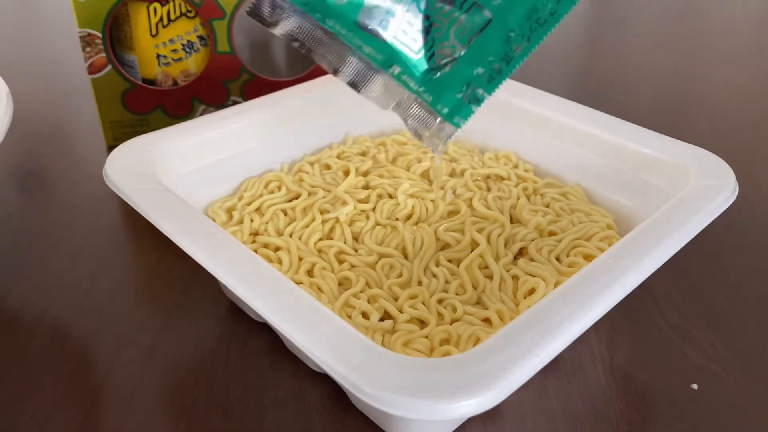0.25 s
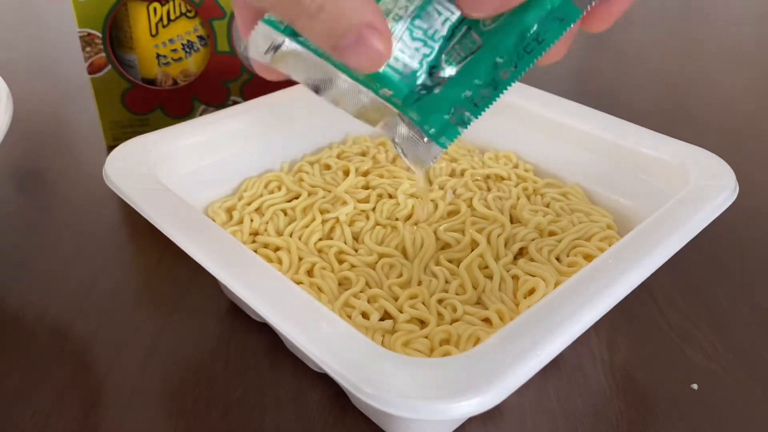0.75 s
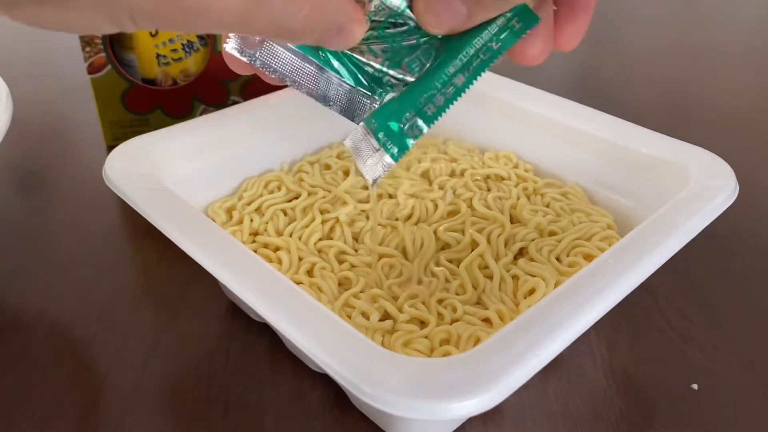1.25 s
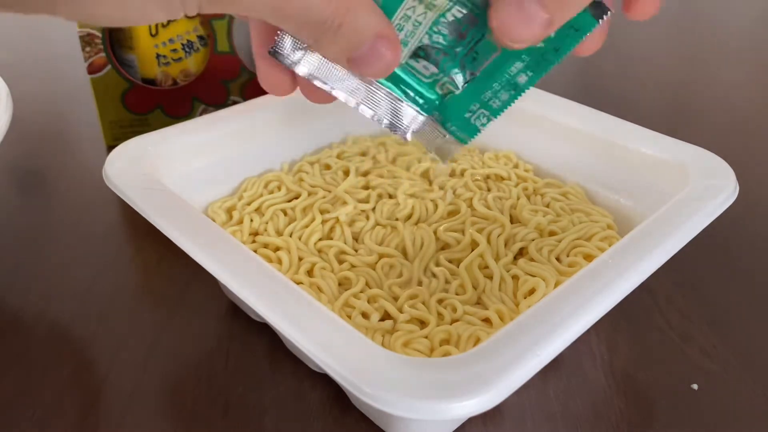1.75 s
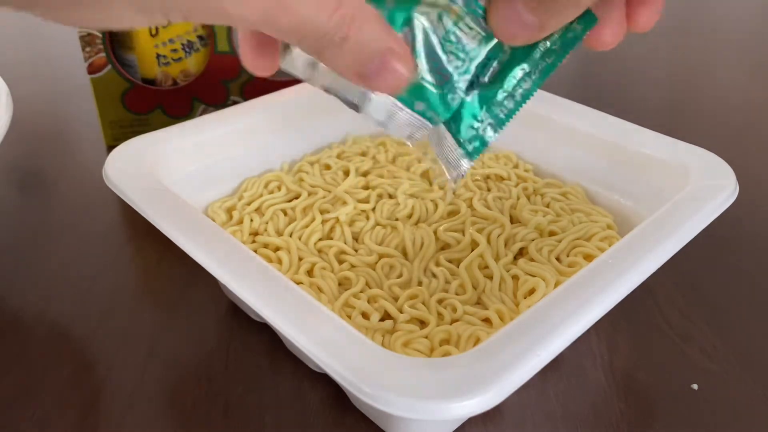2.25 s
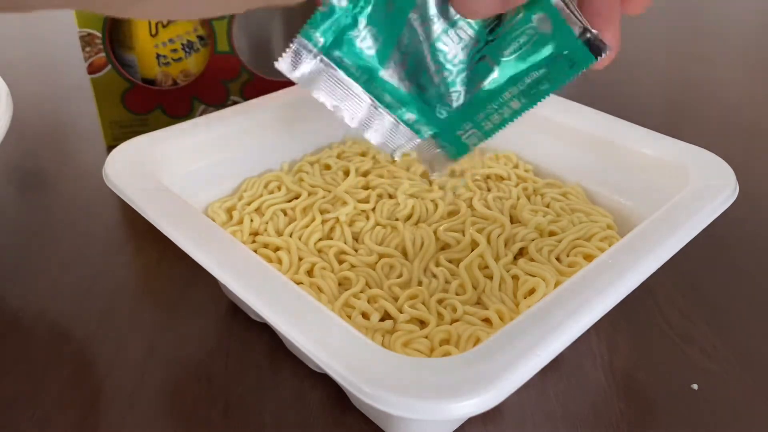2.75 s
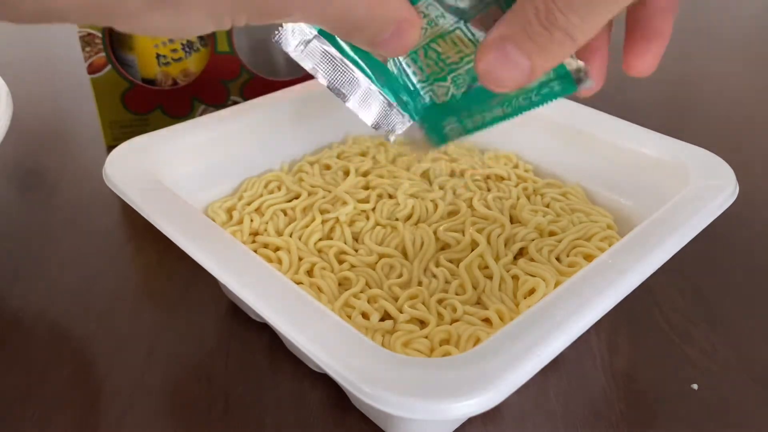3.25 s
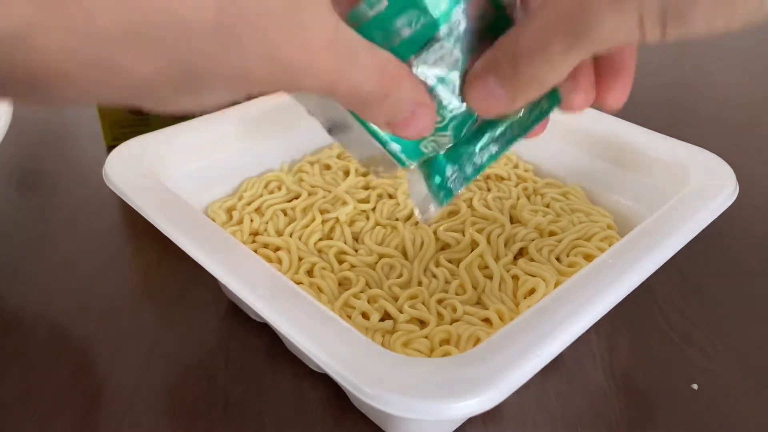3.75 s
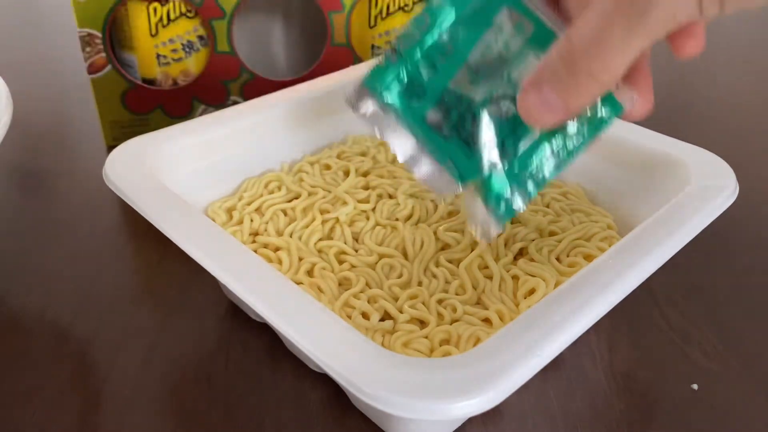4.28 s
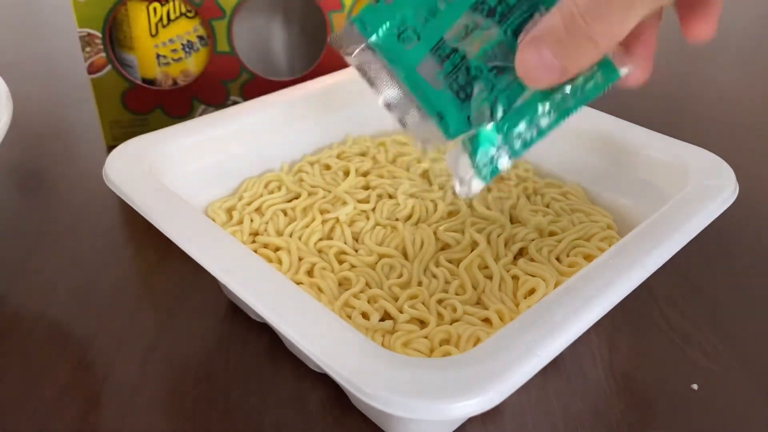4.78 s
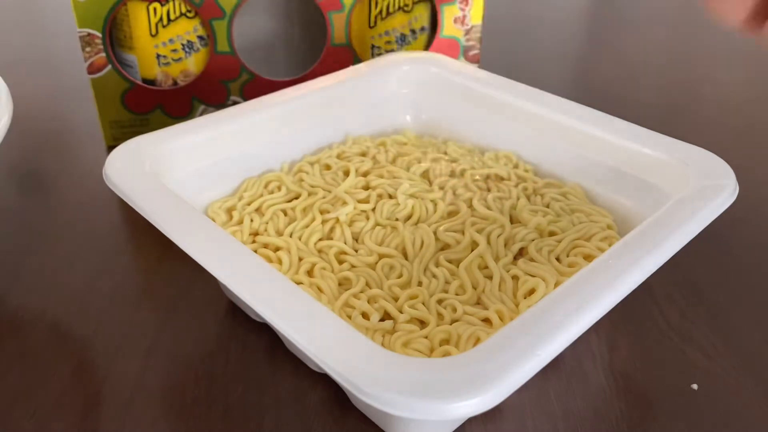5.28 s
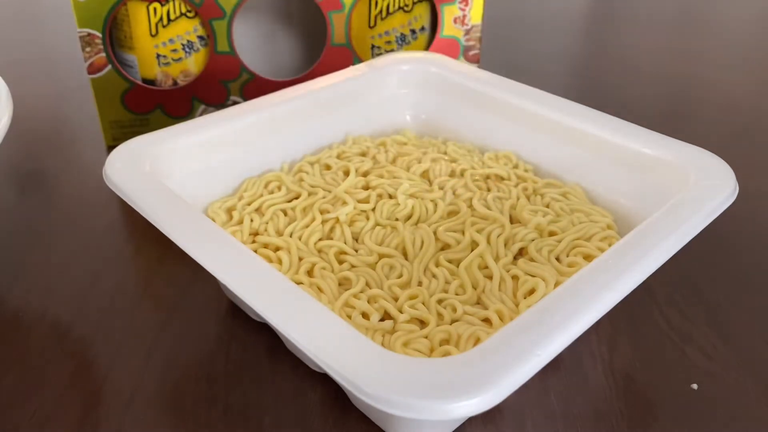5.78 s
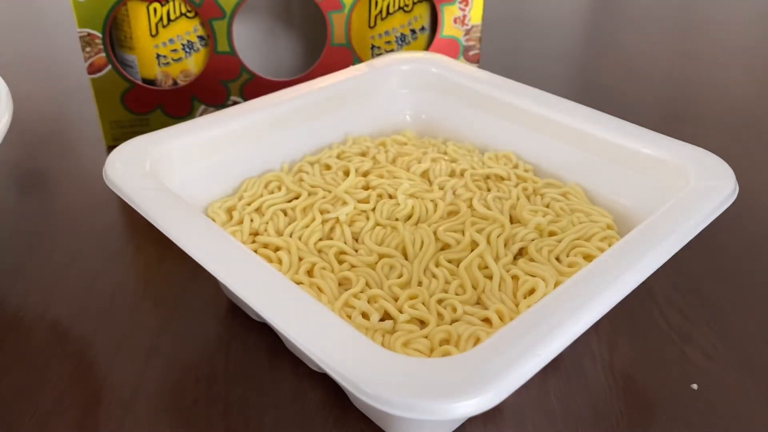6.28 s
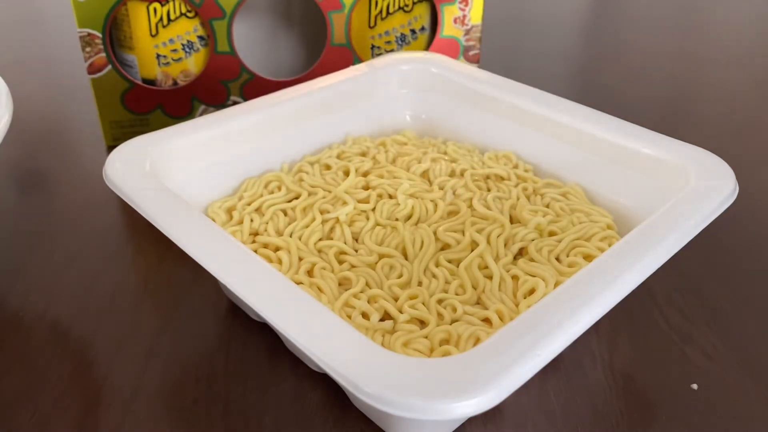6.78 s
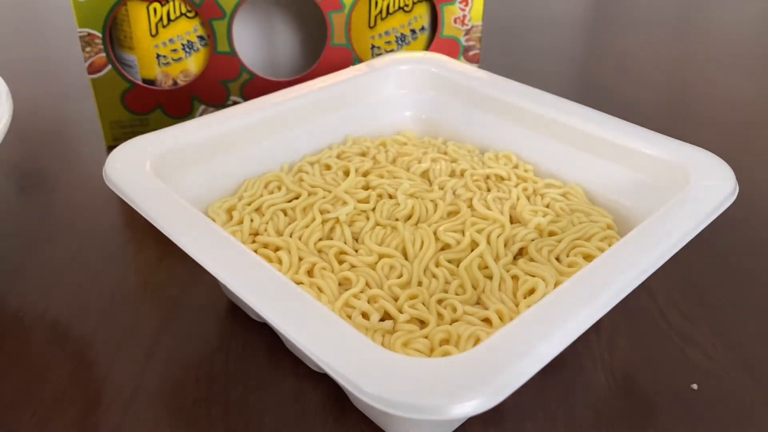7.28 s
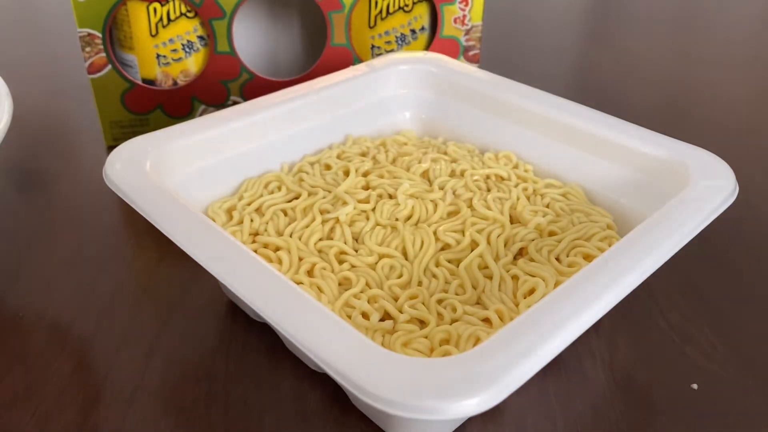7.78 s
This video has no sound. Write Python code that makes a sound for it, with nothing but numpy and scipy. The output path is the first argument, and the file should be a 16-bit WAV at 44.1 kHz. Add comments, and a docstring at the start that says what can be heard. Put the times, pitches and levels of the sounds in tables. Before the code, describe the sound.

Very close to the microphone in a small quiet room, a foil sachet is squeezed and flexed: bright irregular snaps, tiny ticks and brief film rubs, densest around two to three and a half seconds. The crackling thins out, the empty sachet slaps softly onto the table, then packets rustle faintly further away and a dry sachet is shaken in short grainy bursts.

```python
"""Foil sachet squeezed empty over noodles

Close to the microphone in a small room, creases snap as filtered jerks with fluttering noise and pouch thumps.
Fingers rub the film: crackling hiss and a duller scrape. The empty sachet lands as a slap, table modes and a thud.
Further away sachets rustle over the table, film squeaks as wavering sines, and a sachet of dry seasoning
is shaken: noise showers with a hollow ring. Shaped noise gives the room tone and the reverberation.
"""
import sys
import numpy as np
from scipy import signal
from scipy.fft import rfft, irfft
from scipy.io import wavfile

SR = 44100
rng = np.random.default_rng(int(sys.argv[2]) if len(sys.argv) > 2 else 0)


def file_out(sig):
    """Save sig as 16-bit WAV at sys.argv[1]."""
    # one column per channel
    cols = np.atleast_2d(sig).T
    # limit, then scale
    lim = np.clip(cols, -1, 1)
    pcm = np.round(lim * 32767).astype(np.int16)
    wavfile.write(sys.argv[1], SR, pcm)


N = 354123
TIME = np.arange(N) / SR

# room tone spectrum: freq_hz, level_db
AIR_COLOUR = [(18, -28.5), (30, -8), (43, -6), (90, -5), (115, -13.5), (138, -4.5), (221, -7), (252, -3.5),
              (426, -16.5), (649, -19), (844, -23), (2170, -30.5), (2480, -32.5), (13700, -40.5),
              (16000, -39.5)]
AIR_DB = -59

# loudest creases buckling: time_s, level_db, panel_pitch_hz, crack_over_ring_db
SNAPS = [(0.146, -48, 1180, -17), (0.218, -38, 1700, -2.5), (0.317, -42, 1270, -17),
         (0.406, -27, 1520, 5.5), (0.572, -41, 1230, -20), (0.5858, -16, 1610, 9.5), (0.64, -34, 3900, 6),
         (0.7404, -25.5, 2900, -7), (0.842, -40, 1540, -22), (0.8717, -27.5, 1530, -8),
         (0.9135, -29, 3580, 10), (0.931, -37, 3520, 14), (0.9715, -24.5, 13400, 9), (1.152, -29, 4300, 2),
         (1.2017, -34.5, 2520, -14), (1.2064, -36.5, 2270, -5), (1.2885, -32.5, 3700, -16),
         (1.4708, -26.5, 5400, 12), (1.482, -32.5, 1580, 2), (1.5076, -32.0, 2050, -0.5),
         (1.657, -31.5, 2080, -11), (1.808, -41.5, 1250, -7.5), (1.843, -37.5, 1720, -10),
         (2.051, -25, 6650, 7), (2.07, -34.5, 1910, -10), (2.1053, -16.5, 13200, -8.5),
         (2.1196, -31, 3330, 6), (2.1352, -18, 9900, -4), (2.1425, -20, 5060, 0.0),
         (2.2625, -32.0, 3390, -4.5), (2.277, -21.5, 4340, 3), (2.291, -16, 13500, -6),
         (2.2983, -19.0, 9900, 0.0), (2.321, -22, 2035, 9), (2.3647, -32, 2170, 5),
         (2.3878, -33, 1594, -24), (2.4042, -37, 2090, -23), (2.5416, -33.5, 3582, -4.5),
         (2.563, -29.5, 2530, -28), (2.5995, -24.0, 10830, -3.5), (2.8581, -32.5, 1640, 1.5),
         (2.8706, -15.5, 13500, -1.5), (2.8751, -10, 13500, -1), (2.885, -22.5, 1907, 4),
         (2.903, -29.5, 2630, -5.5), (2.92, -12.5, 6060, 9), (2.9248, -21.5, 6070, 0.5),
         (2.9607, -22.5, 6046, -3.5), (3.005, -23.0, 6530, 0.5), (3.0093, -17.5, 5986, -5),
         (3.0165, -18.5, 4880, 3.5), (3.036, -25.5, 5440, -4), (3.1037, -25, 2630, -0.5),
         (3.11, -32.5, 4070, -4.5), (3.2149, -26, 5440, -3.5), (3.252, -32, 1580, -8),
         (3.275, -26.5, 5250, -6.5), (3.288, -10.5, 13500, -6.0), (3.307, -19, 5640, -7),
         (3.3757, -15, 8730, 4), (3.3968, -30, 1470, -15.5), (3.437, -34.5, 2120, 2),
         (3.576, -26, 1730, 7.5), (3.584, -28.5, 5250, 8), (3.594, -26.5, 1430, 6),
         (3.615, -14, 13400, -2.5), (3.739, -28.5, 7400, 11), (3.908, -43, 13000, 2),
         (4.0396, -21.5, 6100, 1), (4.274, -48.5, 3970, -15), (5.1894, -30.5, 5950, -15),
         (5.5616, -27, 4500, 6), (6.4572, -38.5, 4220, 12), (6.5003, -44, 3900, 8),
         (7.4688, -35, 4360, -19), (7.6572, -28, 3650, -7), (7.893, -24, 6070, -14)]
USUAL_SNAP_DB, USUAL_PANEL_HZ = -28, 4000
# pouch thump per snap: more for a hard one and a large (low) panel, less as it empties
THUMP_DB, THUMP_DB_PER_DB, THUMP_DB_PER_OCTAVE, EMPTYING_DB_PER_S = -42.5, 0.81, -6, -0.9

# film hiss spectrum: freq_hz, level_db
RUB_COLOUR = [(1600, -3), (3500, -2), (6000, 1), (10000, 2.5), (15000, 7)]
# fingertip scrape spectrum: freq_hz, level_db
FINGERTIP_COLOUR = [(150, -3), (400, 2), (800, -5), (1600, 0), (3000, -6), (8000, -18)]
# a finger slips over the film: middle_s, length_s, hiss_db, scrape_db
STROKES = [(0.193, 0.029, -48, -60), (0.386, 0.017, -45, -39.5), (0.634, 0.067, -72, -52.5),
           (0.873, 0.015, -75, -53), (0.926, 0.014, -53, -70), (1.281, 0.09, -54, -60),
           (1.297, 0.022, -54, -44.5), (1.515, 0.07, -72, -53.5), (2.071, 0.049, -45.5, -48),
           (2.697, 0.019, -37, -49.5), (3.015, 0.077, -44.5, -73.5), (3.248, 0.023, -32.5, -35.5),
           (3.291, 0.022, -38, -45), (3.602, 0.045, -40.5, -49)]
# fingers squeeze the sachet: start_s, length_s, effort_db
SQUEEZES = [(0.17, 0.062, -55), (0.314, 0.36, -36.5), (0.74, 0.055, -59), (0.816, 0.18, -31.5),
            (1.187, 0.18, -44), (1.45, 0.089, -34), (1.744, 0.14, -51), (2.002, 0.47, -39.5),
            (2.543, 0.23, -42), (2.824, 0.34, -34.5), (3.208, 0.21, -24), (3.534, 0.14, -51)]
USUAL_EFFORT_DB = -47
# film gliding under a squeeze of usual effort; GRIP_S softens its start and end
GLIDE_HISS_DB, GLIDE_SCRAPE_DB, GLIDE_DB_PER_DB, GRIP_S = -65.5, -68, 0.4857, 0.027

# empty sachet touches the table: time_s, level_db
LANDING = [(5.6468, -50), (5.6544, -32.5), (5.657, -27.5), (5.668, -48), (5.686, -39.5)]
# table top modes: freq_hz, level_db, excitation_t60_s
TABLE_MODES = [(447, -1, 0.078), (682, 8.5, 0.028), (1150, 2.5, 0.12), (1400, -7, 0.056), (1900, 4, 0.043),
               (2760, 4, 0.034), (4460, 2.5, 0.015)]

# sachets pushed about on the table: peak_s, level_db, t60_s
SLIDES = [(5.662, -47, 0.31), (5.851, -57.5, 0.06), (6.107, -54.5, 0.22), (6.235, -58, 0.32),
          (6.409, -47, 0.16), (6.515, -50, 0.094), (7.472, -47.5, 0.13), (7.658, -51, 0.66),
          (7.849, -49.5, 0.4), (7.98, -47.5, 0.42)]
SLIDE_RISE_DB_PER_S = 665
# rustle spectrum: freq_hz, level_db
HANDLING_COLOUR = [(300, -11), (700, -1), (1900, 2.5), (4000, -0.5), (8000, -9.5), (15000, -6.5)]

# film squeaking on film: start_s, length_s, start_hz, end_hz, level_db
SQUEAKS = [(5.74, 0.17, 9800, 9600, -74.5), (7.671, 0.11, 8900, 9000, -57),
           (7.884, 0.12, 7950, 7900, -53.5)]

# shakes of the dry sachet: time_s, shower_db, hollow_ring_db
SHAKES = [(7.457, -67, -33.5), (7.657, -30, -35.5), (7.69, -36.5, -38), (7.749, -63, -39),
          (7.8611, -20, -24), (7.8948, -20.5, -40), (7.9073, -21, -27.5), (7.9501, -26, -25.5),
          (7.994, -34.5, -34.5)]
# shower spectrum: freq_hz, level_db
SHAKE_COLOUR = [(300, -1), (800, -9), (1800, 0.5), (3300, -7.5), (4300, 2.5), (5900, 4), (7200, -3.5),
                (11000, 3), (14500, 2.5)]
HOLLOW_HZ, HOLLOW_HZ_PER_DB = 898, -3.5  # lower ring for a harder shake

# reverberation spectrum: freq_hz, level_db
WALL_COLOUR = [(150, -1), (500, 5), (1200, 0.5), (2800, -1.5), (5600, -3), (9000, -3), (16000, -9.5)]
# sachet lifted away from the microphone, more room heard: time_s, reverberation_db
WETNESS = [(0, -22), (4.0, -21), (5.2, -19), (5.55, -13), (8.04, -3)]
CUTOFF_HZ = 16000


def from_db(db):
    """Decibels to gain."""
    return 10 ** (np.asarray(db) / 20)


def rms_one(x):
    """Scale to rms 1."""
    return x / np.sqrt(np.mean(x ** 2) + 1e-20)


def unit_blow(x):
    """Scale to the energy of one millisecond at rms 1."""
    return x * np.sqrt(SR / 1000 / (np.sum(x ** 2) + 1e-20))


def add(out, start_s, x):
    """Mix x into out from start_s on."""
    i = int(round(start_s * SR))
    out[i:i + len(x)] += x[:max(N - i, 0)]


def coloured(x, spectrum, size=4096):
    """Causal (minimum-phase) filter through (freq_hz, level_db) points."""
    hz, db = np.transpose(spectrum)
    grid_hz = np.maximum(np.fft.rfftfreq(size, 1 / SR), 1)
    grid_db = np.interp(np.log(grid_hz), np.log(hz), db)
    # folded cepstrum gives minimum phase
    cepstrum = irfft(np.log(from_db(grid_db)))
    cepstrum[1:size // 2] *= 2
    cepstrum[size // 2 + 1:] = 0
    impulse_response = irfft(np.exp(rfft(cepstrum)))
    return signal.fftconvolve(x, impulse_response)[:len(x)]


def resonance(x, hz, q):
    """Two-pole resonance with peak gain 1."""
    w = 2 * np.pi * min(hz, .45 * SR) / SR
    a = np.sin(w) / (2 * max(q, .1))
    return signal.lfilter([a, 0, -a], [1 + a, -2 * np.cos(w), 1 - a], x)


def high_pass(x, hz, order=2):
    """Remove what lies below hz."""
    return signal.sosfilt(signal.butter(order, hz, "high", fs=SR, output="sos"), x)


def band(x, hz, octaves, order=3):
    """Band-pass around hz."""
    edges_hz = hz * 2 ** (np.array([-octaves, octaves]) / 2)
    edges_hz = np.minimum(edges_hz, [.4 * SR, .45 * SR])
    return signal.sosfilt(signal.butter(order, edges_hz, "band", fs=SR, output="sos"), x + 1e-18)


def burst(t60_s, size=4096):
    """Noise that dies away."""
    return unit_blow(rng.standard_normal(size) * from_db(-60 * TIME[:size] / t60_s))


def drift(per_s):
    """Random wander of spread about 1 that takes per_s new values a second."""
    return np.interp(TIME * per_s, np.arange(4096), rng.standard_normal(4096))


def crackle(per_s, spread_db, hiss_db):
    """Tiny slips of very uneven size over smooth friction hiss; rms 1."""
    sizes = from_db(spread_db * np.minimum(rng.exponential(1, N), 4)) * rng.choice([-1, 1], N)
    slips = sizes * (rng.random(N) < per_s / SR)
    return rms_one(rms_one(slips) + from_db(hiss_db) * rng.standard_normal(N))


def wrinkles(per_s, spread_db, hiss_db, patchy_db, count=10):
    """Film facets of many sizes crackle, each size in clumps of its own; rms 1."""
    total = np.zeros(N)
    for hz in np.geomspace(700, 14000, count):
        facet = band(crackle(per_s, spread_db, hiss_db), hz, 0.9, order=2)
        total += facet * from_db(patchy_db * drift(70))
    return rms_one(total)


def room_tone():
    """Low steady murmur of the room with faint hiss."""
    air = coloured(rng.standard_normal(N + SR), AIR_COLOUR, size=16384)
    air = high_pass(air, 28, order=10)[SR:]  # drop the filter's settling
    return from_db(AIR_DB) * rms_one(air)


def snaps(flutter_t60_s=0.0105, flutter_db=3.5, crack_hz=4000, crack_low_hz=1000, panel_octaves=1.0,
          pouch_hz=380, pouch_q=1.1, lead_in_db=-15, lead_in_t60_s=0.003, size=1024):
    """Each snap is a short swell of noise into one jerk, then milliseconds of fluttering noise."""
    out = np.zeros(N)
    jerk = unit_blow(signal.unit_impulse(size))
    for time_s, level_db, hz, crack_db in SNAPS:
        flutter = from_db(flutter_db) * burst(flutter_t60_s, size=size)
        lead_in = from_db(lead_in_db) * burst(lead_in_t60_s, size=size)[::-1]
        push = np.concatenate([lead_in, jerk + flutter])
        # a small panel radiates little bass
        crack = high_pass(resonance(push, crack_hz, 0.36), crack_low_hz)
        ring = band(push, hz, panel_octaves, order=2)
        snap = unit_blow(from_db(crack_db) * unit_blow(crack) + unit_blow(ring))
        add(out, time_s - size / SR, from_db(level_db) * snap)  # jerk falls on time_s

        harder_db = level_db - USUAL_SNAP_DB
        octaves_up = np.log2(hz / USUAL_PANEL_HZ)
        thump_db = THUMP_DB + THUMP_DB_PER_DB * harder_db
        thump_db += THUMP_DB_PER_OCTAVE * octaves_up + EMPTYING_DB_PER_S * time_s
        thump = resonance(jerk, pouch_hz * 2 ** rng.uniform(-0.37, .3), pouch_q)
        add(out, time_s, from_db(thump_db) * unit_blow(thump))
    return out


def rubbing():
    """Film glides faintly through each squeeze and swells where a finger slips: wrinkling hiss, dull scrape."""
    film = wrinkles(per_s=410, spread_db=3.5, hiss_db=-11.0, patchy_db=2.0)
    # larger slips shake all facets at once
    film = film + from_db(-1.5) * crackle(per_s=310, spread_db=7.5, hiss_db=-21.5)
    hiss = rms_one(high_pass(coloured(film, RUB_COLOUR), 800))
    scrape = coloured(crackle(per_s=510, spread_db=5.0, hiss_db=-4.0), FINGERTIP_COLOUR)
    scrape = rms_one(high_pass(scrape, 110))

    grip = np.zeros(N)
    for start_s, length_s, effort_db in SQUEEZES:
        corners_s = [start_s - GRIP_S, start_s + GRIP_S,
                     start_s + max(length_s, GRIP_S), start_s + length_s + GRIP_S]
        held = np.interp(TIME, corners_s, [0, 1, 1, 0])
        grip += held * from_db(GLIDE_DB_PER_DB * (effort_db - USUAL_EFFORT_DB))
    out = grip * (from_db(GLIDE_HISS_DB) * hiss + from_db(GLIDE_SCRAPE_DB) * scrape)

    for middle_s, length_s, hiss_db, scrape_db in STROKES:
        now = slice(*np.searchsorted(TIME, [middle_s - 2 * length_s, middle_s + 2 * length_s]))
        swell = np.exp(-(2 * (TIME[now] - middle_s) / length_s) ** 2)
        out[now] += swell * (from_db(hiss_db) * hiss[now] + from_db(scrape_db) * scrape[now])
    return out


def small_creases(base_db=-54, spread_db=9, db_per_effort_db=0.35, low_hz=1200, t60_s=0.0069, count=6):
    """Every squeeze sets off a few faint ticks, louder under more effort."""
    out = np.zeros(N)
    for start_s, length_s, effort_db in SQUEEZES:
        firm_db = base_db + db_per_effort_db * (effort_db - USUAL_EFFORT_DB)
        for when, pitch, strength in rng.random((count, 3)):
            tick = band(burst(t60_s, size=1024), low_hz * 4 ** pitch, 2.3, order=2)
            tick_db = firm_db + spread_db * strength
            add(out, start_s + when * length_s, from_db(tick_db) * unit_blow(tick))
    return out


def landing(slap_hz=3500, slap_q=0.11, slap_t60_s=0.012, ring_db=-10, mode_q=9,
            thud_s=5.66, thud_db=-30, thud_hz=185, thud_t60_s=0.074, size=8192):
    """The sachet slaps down and settles; every touch rings the table top, and its weight adds a soft thud."""
    out = np.zeros(N)
    for time_s, level_db in LANDING:
        slap = unit_blow(resonance(burst(slap_t60_s, size=size), slap_hz, slap_q))
        ring = np.zeros(size)
        for hz, mode_db, t60_s in TABLE_MODES:
            ring += from_db(mode_db) * unit_blow(resonance(burst(t60_s, size=size), hz, mode_q))
        add(out, time_s, from_db(level_db) * (slap + from_db(ring_db) * ring))
    thud = burst(thud_t60_s, size=size)
    thud = resonance(resonance(thud, thud_hz, 1.5), thud_hz, 1.5)
    add(out, thud_s, from_db(thud_db) * unit_blow(thud))
    return out


def handling():
    """Duller rustle as sachets are moved on the table; each push swells quickly and dies away."""
    grains = wrinkles(per_s=260, spread_db=2.0, hiss_db=-3, patchy_db=4.5)
    rustle = rms_one(high_pass(coloured(grains, HANDLING_COLOUR), 250))
    motion = np.zeros(N)
    for peak_s, level_db, t60_s in SLIDES:
        rise_db = SLIDE_RISE_DB_PER_S * (peak_s - TIME)
        fall_db = 60 * (TIME - peak_s) / t60_s
        motion += from_db(level_db - np.maximum(rise_db, fall_db))
    return motion * rustle


def squeaks(waver_hz=600):
    """Film sliding on film: short unsteady whistles that swell fast and fade."""
    out = np.zeros(N)
    for start_s, length_s, start_hz, end_hz, level_db in SQUEAKS:
        u = np.linspace(0, 1, int(length_s * SR))
        hz = start_hz + (end_hz - start_hz) * u + waver_hz * rng.standard_normal(len(u))
        swell = np.sin(np.pi * np.sqrt(u))
        whistle = np.sqrt(2) * np.sin(2 * np.pi * np.cumsum(hz) / SR)
        add(out, start_s, from_db(level_db) * swell * whistle)
    return out


def shakes(shower_t60_s=0.048, contents_t60_s=0.1, hollow_q=2.03, clump_db=4.5):
    """Dry flakes hit the film in a short shower and make the pouch ring hollow."""
    out = np.zeros(N)
    usual_db = np.mean([row[1] for row in SHAKES])
    for time_s, shower_db, hollow_db in SHAKES:
        clumps = from_db(clump_db * drift(644)[:4096])
        shower = coloured(burst(shower_t60_s) * clumps, SHAKE_COLOUR)
        hz = HOLLOW_HZ + HOLLOW_HZ_PER_DB * (shower_db - usual_db)
        hollow = resonance(resonance(burst(contents_t60_s), hz, hollow_q), hz, hollow_q)
        add(out, time_s, from_db(shower_db) * unit_blow(shower) + from_db(hollow_db) * unit_blow(hollow))
    return out


def room(x, wet_db, t60_s=0.3, early_db=-2, early_t60_s=0.14, gap_s=.007, size=22050):
    """After a short gap, a fast and a slow diffuse decay start together."""
    tail = burst(t60_s, size=size) + from_db(early_db) * burst(early_t60_s, size=size)
    tail = coloured(np.concatenate([np.zeros(int(gap_s * SR)), tail]), WALL_COLOUR)
    tail = tail / np.linalg.norm(tail)
    return x + from_db(wet_db) * signal.fftconvolve(x, tail)[:N]


def scene():
    """Foil in front of the microphone, wetter sounds from the side of the table, room tone."""
    wet_db = np.interp(TIME, *np.transpose(WETNESS))
    near = room(snaps() + small_creases() + rubbing(), wet_db=wet_db)
    far = room(landing() + handling() + shakes() + squeaks(), wet_db=-14.5)
    return (near + far + room_tone())[None]


def record(dry):
    """The microphone loses the deepest bass and rounds off the top, which is then cut steeply."""
    heard = high_pass(dry, 38, order=8)
    heard = signal.sosfilt(signal.butter(4, 15300, fs=SR, output="sos"), heard)
    return signal.sosfilt(signal.ellip(10, .1, 80, CUTOFF_HZ, fs=SR, output="sos"), heard)


dry = scene()
out = record(dry)
file_out(out)
```